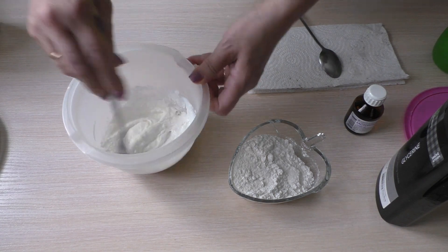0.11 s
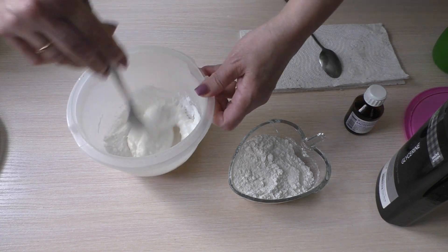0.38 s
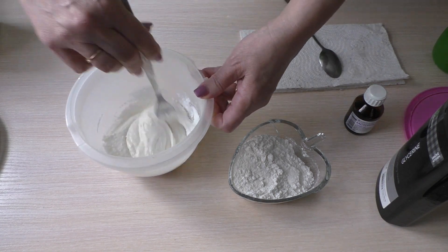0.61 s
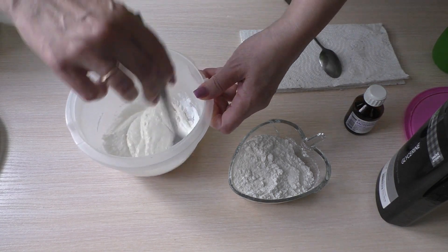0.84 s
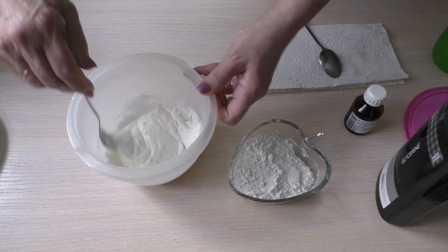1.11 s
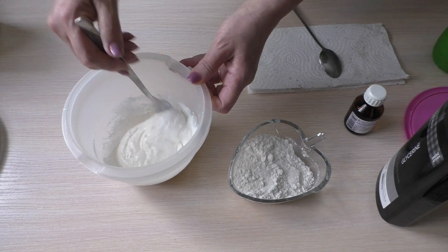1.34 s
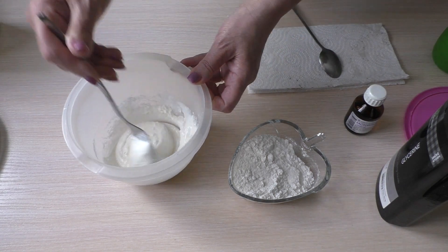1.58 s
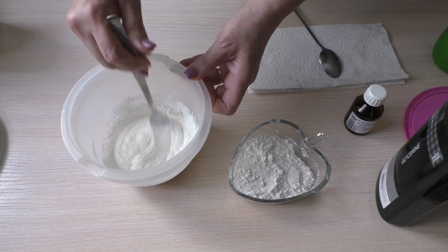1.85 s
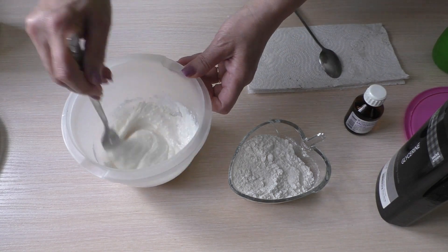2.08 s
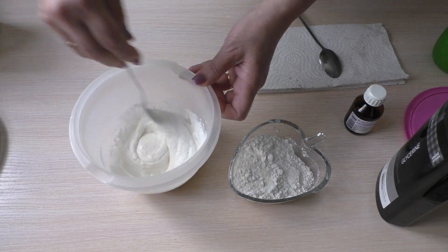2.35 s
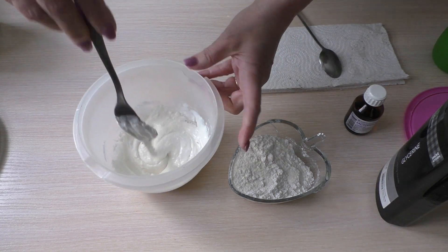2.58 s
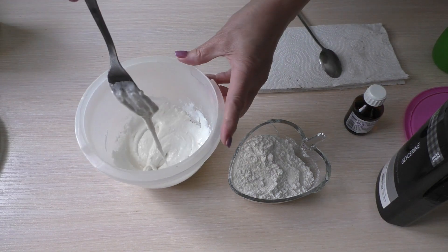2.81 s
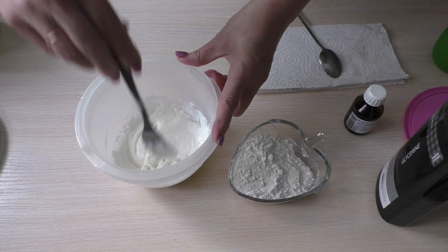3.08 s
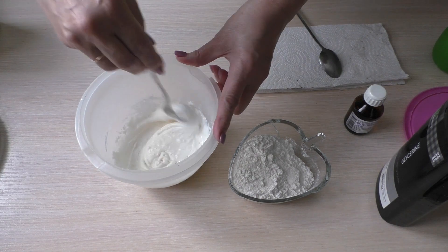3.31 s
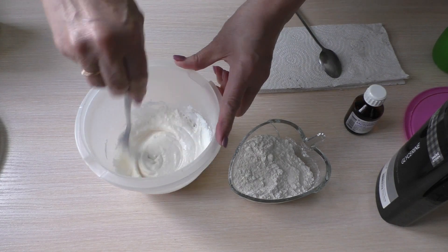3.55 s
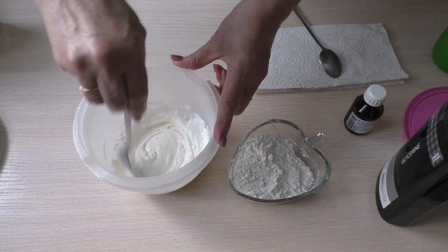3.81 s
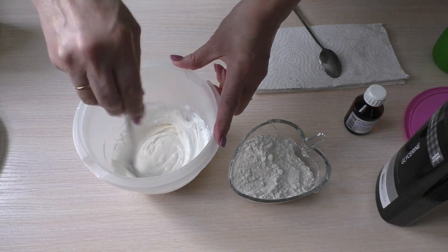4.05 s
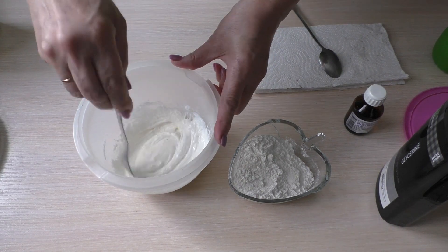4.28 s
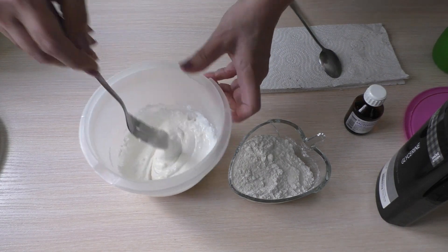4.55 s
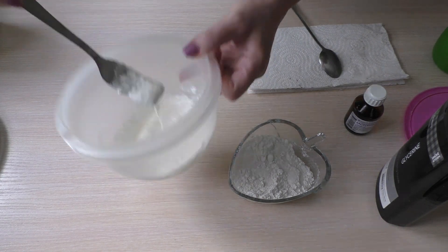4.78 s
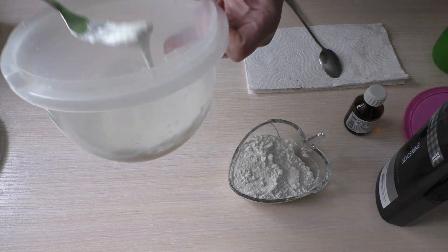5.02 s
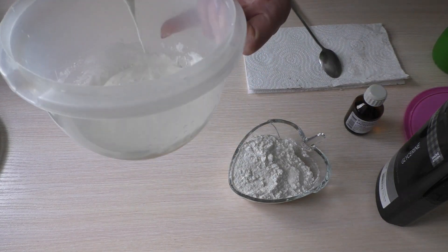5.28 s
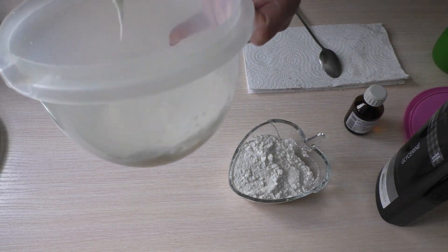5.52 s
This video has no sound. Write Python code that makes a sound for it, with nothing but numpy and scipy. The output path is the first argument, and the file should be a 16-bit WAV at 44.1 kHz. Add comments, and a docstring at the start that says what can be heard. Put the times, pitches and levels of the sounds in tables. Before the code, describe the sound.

A metal fork scrapes and ticks in uneven bursts inside a thin plastic bowl, with hollow knocks growing harder before the bowl is lifted.

```python
"""Scratchy strokes, sharp ticks and booming knocks: a metal fork stirs thick paste in a thin plastic bowl.
The tines drag over the wall as stick-slip grains that ring its modes, tick against it and hiss in the treble;
knocks and rubbing ring the bottom; near the end the bowl is lifted off the table and a finger squeaks on it.
A small quiet room adds a short tail and steady noise; a close stereo microphone overloads on the hardest knocks."""
import sys
import numpy as np
from scipy import signal
from scipy.fft import rfft, irfft
from scipy.io import wavfile

SR = 44100
rng = np.random.default_rng(int(sys.argv[2]) if len(sys.argv) > 2 else 0)


def generate_wav(signal):
    """Clip the signal to [-1, 1] and save it as 16-bit WAV at the path in sys.argv[1]."""
    frames = np.transpose(np.atleast_2d(signal))
    scaled = np.clip(frames, -1, 1) * 32767
    pcm = np.round(scaled).astype(np.int16)
    wavfile.write(sys.argv[1], SR, pcm)


def level_to_linear(level):
    """Convert decibel levels to linear amplitude factors, elementwise."""
    exponent = np.asarray(level, float) / 20
    return 10 ** exponent


N = 248724

# Ticks of the tines on the wall. Each row: time in seconds, peak of the ringing wall in dB (before its high-pass),
# brightest region of the wall in Hz, treble crack in dB (before a boost shared by all), contact decay in seconds.
TICKS = [(0.228, -14, 4500, -21, 0.0045), (0.233, 5, 750, -38, 0.004), (0.2706, -3.5, 1890, -37, 0.0029),
         (0.32, -7.5, 1280, -49, 0.0028), (0.62, -15.5, 2090, -38, 0.00092),
         (0.643, -10, 2210, -32, 0.0012), (0.845, -26, 1980, -48, 0.0015),
         (0.941, -15.5, 2490, -41, 0.0015), (1.228, -30, 5500, -32, 0.0011), (1.249, -28, 5500, -30, 0.001),
         (1.303, -28, 2800, -30, 0.00092), (1.3157, -5, 2470, -32, 0.00097),
         (1.396, -12, 2420, -45, 0.0027), (1.5283, -13, 2450, -48, 0.0051),
         (1.5704, -7.5, 2150, -52, 0.0012), (1.831, -19, 2000, -38, 0.0029),
         (1.8807, -12, 1650, -39, 0.0016), (1.957, -11, 2260, -40, 0.003), (2.196, -12, 1180, -51, 0.0016),
         (2.272, -10.5, 1890, -50, 0.0014), (2.391, -16.5, 1900, -41, 0.0031),
         (2.495, -16.5, 1890, -39.5, 0.0014), (2.609, -34, 6900, -43, 0.002),
         (2.648, -43, 6900, -51, 0.001), (3.243, -8, 1680, -36, 0.002), (3.27, -4.5, 1540, -44, 0.0014),
         (3.304, -7, 1690, -44, 0.0011), (3.3844, -6.5, 2800, -37, 0.0019), (3.5404, -8, 2100, -41, 0.002),
         (3.6406, -13, 1990, -43, 0.0019), (3.672, -1, 1890, -28, 0.00049), (3.73, -5.5, 2960, -36, 0.0018),
         (3.7425, -8.5, 1280, -27.5, 0.0015), (3.8395, -9.5, 2720, -33.5, 0.0044),
         (3.934, -13.5, 1890, -46, 0.001), (3.9588, 0.5, 2420, -29, 0.0024),
         (3.9978, 3.5, 1890, -20.5, 0.0019), (4.152, 8, 1620, -37, 0.00051),
         (4.202, -9, 2040, -24.5, 0.0034), (4.22, 1, 3700, -20, 0.0012), (4.229, -16, 3050, -26, 0.001),
         (4.3795, 0, 1540, -39, 0.0024), (4.4094, -6.5, 3240, -32.5, 0.006),
         (4.536, -19.5, 1890, -32, 0.0032), (4.597, -18.5, 4420, -33, 0.00084),
         (4.6156, 2.5, 3150, -20, 0.0016), (4.7478, 1.5, 4200, -15, 0.0004),
         (5.5266, -20, 3600, -34, 0.0045)]
# Modes of the bowl's bottom. Each row: frequency in Hz, relative strength in dB, decay as a share of the common t60.
BOTTOM_MODES = [(127, -21.5, 0.69), (213, -8, 0.51), (266.8, -1.5, 0.93), (286.4, -3, 0.9),
                (314.8, -1, 0.37), (402.4, -3.5, 0.57), (453, -15, 1.3), (578, -24, 1.15),
                (646, -18.5, 0.77), (739, -15.5, 0.45)]


def rms_one(x):
    """Scale to unit rms."""
    return x / np.sqrt(np.mean(x ** 2) + 1e-20)


def at_hz(points, hz):
    """Read a spectrum on a log-frequency axis."""
    points = np.array(points)
    return np.interp(np.log(hz), np.log(points[:, 0]), points[:, 1])


def in_time(rows):
    """Columns of a curve table at every sample; the end values hold outside it."""
    s, *columns = np.transpose(rows)
    return [np.interp(np.arange(N) / SR, s, column) for column in columns]


def drift(rate_hz):
    """Random wander of unit rms: noise smoothed by two equal poles at rate_hz, made at every 20th sample."""
    pole = np.exp(-40 * np.pi * rate_hz / SR)
    noise = rng.standard_normal(N // 20 + 2002)
    slow = signal.lfilter([1], [1, -2 * pole, pole * pole], noise)[2000:]
    return np.interp(np.arange(N) / 20, np.arange(len(slow)), rms_one(slow))


def ring(drive, hz, t60):
    """One mode as a resonator: a unit click sets a dying sine of height 1 ringing."""
    radius, angle = level_to_linear(-60 / (t60 * SR)), 2 * np.pi * hz / SR
    feedback = [1, -2 * radius * np.cos(angle), radius * radius]
    return signal.lfilter([0, np.sin(angle)], feedback, drive + 1e-18)


def coloured(x, spectrum):
    """Give x the colour of a spectrum."""
    hz = np.maximum(np.arange(N // 2 + 1) * SR / N, 10)
    return irfft(rfft(x) * level_to_linear(at_hz(spectrum, hz)), N)


def high_pass(x, hz):
    """Small sources radiate little below their lowest mode."""
    return signal.sosfilt(signal.butter(2, hz, "high", fs=SR, output="sos"), x)


def grains(per_s, spread_db, smooth):
    """Uneven stick-slip clicks over a smooth rub; rms 1."""
    sizes = level_to_linear(spread_db * np.minimum(rng.exponential(1, N), 5)) * rng.choice([-1, 1], N)
    slips = rms_one(sizes * (rng.random(N) < per_s / SR))
    return rms_one(slips + smooth * rng.standard_normal(N))


def near(hz, centre_hz, octaves, rest):
    """Modes close to where the tines bear are driven hardest: a bell in octaves over a floor."""
    distance = np.log2(hz / centre_hz) / octaves
    return rest + np.exp(-.5 * distance ** 2)


def stirring():
    """Each stroke bites, slackens a little and lets go; overlapping strokes add in power to steer all the rubbing."""
    # Strokes over the wall. Each row: start in seconds, length in seconds, drag at the start in dB,
    # brightest region of the wall in Hz, weight on the bottom against the drag in dB.
    strokes = [(0.0, 0.018, -25, 2160, 0), (.04, .11, -39.5, 1900, 0), (.16, 0.12, -33, 1830, 1),
               (.228, 0.08, -23.5, 2000, -1.5), (.315, 0.052, -28.5, 2470, 1.5),
               (.56, 0.05, -34.5, 2000, -1), (.638, 0.096, -25, 2650, -2.5), (.848, 0.31, -36, 2100, -5),
               (.9, 0.072, -36, 2400, -17), (1.17, .125, -36, 2800, -7), (1.3, 0.075, -25.5, 2700, -2.5),
               (1.38, 0.061, -26, 1860, -0.5), (1.47, 0.045, -30.5, 2240, -9),
               (1.52, 0.043, -30.5, 2380, -3.5), (1.825, 0.027, -33, 1900, -2),
               (1.88, 0.028, -33.5, 1800, 2.5), (1.93, 0.033, -29, 2200, -7.5),
               (2.07, 0.095, -33.5, 2500, -4), (2.15, 0.049, -31.5, 1800, 6.5), (2.225, 0.1, -25, 2000, 0),
               (2.345, 0.068, -31, 2070, 6.5), (2.42, 0.085, -40.5, 2000, 3),
               (2.8, 0.082, -39.5, 1900, 6.5), (2.85, 0.055, -34, 2300, 4.5), (3.28, 0.038, -29, 1700, -11),
               (3.33, 0.069, -25.5, 2980, -1.5), (3.42, 0.075, -30.5, 2580, -2),
               (3.51, 0.078, -28, 2080, -1.5), (3.615, 0.12, -26.5, 2200, -7),
               (3.76, 0.092, -28.5, 2900, -3), (3.87, 0.07, -30.5, 2170, -3.5),
               (3.935, 0.11, -26, 2600, -7), (4.06, 0.073, -43, 2600, 4), (4.17, .035, -20.5, 1730, -4.5),
               (4.205, 0.033, -23.5, 2670, -0.5), (4.26, 0.094, -40.5, 1900, 8),
               (4.44, 0.14, -37, 1900, 4.5), (4.62, 0.037, -36, 3750, -3), (4.655, .085, -37, 2800, 4),
               (4.755, 0.023, -38.5, 4470, -6), (5.525, 0.087, -38.5, 2205, -5.5)]
    bite_db_per_s, let_go_db_per_s, sag_db_per_s = 900, 702, 5
    # between strokes the fork still moves in the paste until the bowl is lifted
    idle_db, idle_hz, idle_weight_db = -45, 1900, 2.5
    lift_s, lift_db_per_s = 4.8, 146
    hiss_base_db = -12.5      # against the drag at 2200 Hz with no extra weight
    hiss_db_per_octave, skim_hiss = 2, 0.16      # more hiss higher up the wall, and per dB that the fork weighs less
    heavy_base_db, rumble_base_db = -6.5, -1      # low wall modes and bottom, against drag plus weight

    t = np.arange(0, N, 32) / SR
    rows = [*strokes, (0, 0, 0, idle_hz, idle_weight_db)]
    s, length, db, hz, weight_db = (column[:, None] for column in np.transpose(rows))
    bite = bite_db_per_s * np.maximum(s - t, 0)
    sag = sag_db_per_s * np.clip(t - s, 0, length)
    let_go = let_go_db_per_s * np.maximum(t - s - length, 0)
    shape_db = db - bite - sag - let_go
    shape_db[-1] = idle_db - lift_db_per_s * np.maximum(t - lift_s, 0)
    power = level_to_linear(2 * np.maximum(shape_db, -120))

    def level(extra_db):
        """Summed power of all strokes in dB, each shifted by its extra."""
        return 10 * np.log10(np.sum(power * level_to_linear(2 * extra_db), axis=0))

    centre_hz = np.sum(power * hz, axis=0) / power.sum(axis=0)
    hiss_db = hiss_base_db + level(hiss_db_per_octave * np.log2(hz / 2200) - skim_hiss * weight_db)
    weight_level = level(weight_db)
    controls = level(0 * hz), centre_hz, hiss_db, heavy_base_db + weight_level, rumble_base_db + weight_level
    return [np.interp(np.arange(N) / SR, t, control) for control in controls]


def contacts():
    """Each tick is a click followed by a short chatter that dies away."""
    t = np.arange(2400) / SR
    decay_s = np.clip(np.array(TICKS)[:, 4:5], 2e-4, .01)
    out = .2 * rng.standard_normal((len(TICKS), len(t))) * np.exp(-t / decay_s)
    out[:, 0] = 1
    return out


def lay(bursts, peaks_db):
    """Place one burst at each tick, at its peak level."""
    out = np.zeros((*bursts.shape[1:-1], N + bursts.shape[-1]))
    for row, burst, db in zip(TICKS, bursts, peaks_db):
        at = round(row[0] * SR)
        out[..., at:at + burst.shape[-1]] += level_to_linear(db) * burst / np.abs(burst).max()
    return out[..., :N]


def wall(drag_db, centre_hz, heavy_db):
    """Drag and ticks drive the wall modes, each a little louder on the left and in alternating polarity."""
    # Modes of the bowl's wall. Each row: frequency in Hz, relative strength in dB, t60 in seconds under the drag.
    wall_modes = [(480, 2.5, 0.016), (590, -22, 0.017), (799, -8.5, 0.043), (890, -16, 0.015),
                  (955, -2, 0.017), (1136, -9, 0.056), (1280, 1.5, 0.017), (1540, 2.5, 0.017),
                  (1720, 5.5, 0.014), (1890, 3.5, 0.016), (2060, 1.5, 0.012), (2272, -0.5, 0.01),
                  (2410, 3, 0.0079), (2650, -2.5, 0.028), (2733, 2.5, 0.016), (3105, 7, 0.012),
                  (3435, 7.5, 0.0066), (3860, 1.5, 0.017), (4110, 0, 0.0095), (4306, -1, 0.015),
                  (4510, 5.5, 0.007), (5820, 4.5, 0.0036), (5600, -3.5, 0.0044), (6400, 9, 0.0033),
                  (7100, 4, 0.0043)]
    heavy_below_hz = 1250      # modes below this follow the weight, the others the drag
    tick_octaves, tick_octaves_per_db = 0.61, 0.02      # breadth driven by a 0 dB tick; softer ticks reach less

    lumps = level_to_linear(2.4 * drift(35))
    rubs = [lumps * grains(per_s=1500, spread_db=4.5, smooth=0.71) for tine in range(4)]
    ticks = contacts()
    _, peak_db, tick_hz, _, _ = np.transpose(TICKS)
    breadth = np.maximum(tick_octaves + tick_octaves_per_db * peak_db, .1)
    luck = rng.normal(0, 1, (len(TICKS), len(wall_modes)))
    drags, hits, powers = np.zeros((2, 2, N)), 0, np.zeros((2, N))
    for k, (hz, db, t60) in enumerate(wall_modes):
        lean_db = 0.82 + 0.47 * (-1) ** (k // 2)
        side = (-1) ** k * level_to_linear(np.array([[1], [-1]]) * lean_db)

        heavy = int(hz < heavy_below_hz)
        focus = 1.5 * near(hz, centre_hz, octaves=.14, rest=0)
        spread = near(hz, centre_hz, octaves=0.81, rest=0.32)
        bearing = level_to_linear(db) * (1 if heavy else focus + spread)
        powers[heavy] += bearing ** 2 * t60 * SR / (12 * np.log(10))      # power of the ringing under unit noise
        rub = rubs[k // 2 % 4] * bearing * level_to_linear(1.4 * drift(52))
        drags[heavy] += side * ring(rub, hz, t60)

        strength = level_to_linear(db + 2.5 * luck[:, k])
        strike = strength * near(hz, tick_hz, breadth, rest=0.033)
        hits = hits + side * ring(ticks * strike[:, None], hz, 0.46 * t60)[:, None]      # ticks ring shorter
    drag = level_to_linear([drag_db, heavy_db])[:, None] * drags / np.sqrt(powers)[:, None]
    return high_pass(drag.sum(axis=0) + lay(hits, peak_db), hz=506)


def tines(hiss_db):
    """The treble: a fine scratch under the stroke, its colour wandering, and a crack at each tick."""
    # Colour of the scratch. Each row: frequency in Hz, relative density in dB per Hz.
    hiss_colour = [(2350, -57), (4000, 10.5), (4540, -2), (5250, 4.5), (6180, -15), (7880, 0),
                   (14400, -0.5), (16000, -21)]
    mid, side = [grains(per_s=11000, spread_db=0.5, smooth=0.83) for part in range(2)]
    flutter = level_to_linear(2 * drift(40))
    scratch = coloured((mid + 0.06 * side * [[1], [-1]]) * flutter, hiss_colour)
    top = high_pass(scratch, hz=9400)
    scratch = top * level_to_linear(1.5 * drift(12)) + (scratch - top) * level_to_linear(1.5 * drift(12))
    crack_band = signal.butter(2, [4000, 13500], "band", fs=SR, output="sos")
    cracks = lay(signal.sosfilt(crack_band, contacts()), np.array(TICKS)[:, 3])
    both = level_to_linear(hiss_db) * rms_one(scratch) + level_to_linear(14.5) * cracks
    return both * level_to_linear([[.7], [-.7]])      # slightly louder on the left


def knocks():
    """A soft blow rings every bottom mode; hand and paste damp it fast."""
    # Knocks on the bottom. Each row: time in seconds, peak in dB before the bottom's high-pass.
    blows = [(0.233, 5), (0.314, -12), (0.678, -23), (0.846, -22), (1.189, -28.5), (1.387, -16),
             (1.877, -15.5), (2.001, -21), (2.151, -19), (2.23, -13.5), (2.296, -16), (2.329, -9),
             (2.494, -22.5), (2.59, -17.5), (3.245, -2), (3.272, 0), (3.413, -16), (3.555, -16),
             (3.742, -11.5), (4.014, -10.5), (4.152, 3.5), (4.381, 3.5), (4.572, -10), (4.647, -16.5),
             (4.695, -16)]
    t60_s, t60_s_per_db = 0.066, 0.0031      # decay of a 0 dB knock; a softer one is pressed less and rings longer
    out, length = np.zeros(N + SR), SR // 2
    t = np.arange(length) / SR
    luck = rng.normal(0, 1, (len(blows), len(BOTTOM_MODES)))
    for (s, peak_db), strengths in zip(blows, luck):
        boom = np.zeros(length)
        for (hz, db, share), chance in zip(BOTTOM_MODES, strengths):
            # a blow reaches the upper modes better than a slow push does
            start_db = db + 2.0 * chance + 2.2 * np.log2(hz / 300)
            mode_t60 = (t60_s - t60_s_per_db * peak_db) * share
            boom += level_to_linear(start_db - 60 * t / mode_t60) * np.sin(2 * np.pi * hz * t)
        boom *= 1 - np.exp(-t / 0.0044)      # the blow takes time to land
        at = round(s * SR)
        out[at:at + length] += level_to_linear(peak_db) * boom / np.abs(boom).max()
    return out[:N]


def rumble(level_db):
    """Dragging keeps the bottom modes humming in lumps."""
    rub = grains(per_s=400, spread_db=3.0, smooth=.9) * level_to_linear(1.5 * drift(30))
    hum = sum(level_to_linear(db) * ring(rub, hz, 0.18 * share) for hz, db, share in BOTTOM_MODES)
    return level_to_linear(level_db) * rms_one(hum)


def squeak():
    """A finger slides on the lifted bowl: a faint narrow wavering tone of skin slipping on plastic."""
    # Path of the tone. Each row: time in seconds, mean frequency in Hz, mean level in dB.
    slide = [(4.8, 2220, -80), (4.82, 2200, -40), (4.85, 1890, -38), (4.87, 1900, -60), (4.95, 1890, -46),
             (4.99, 1825, -53)]
    hz, level_db = in_time(slide)
    wavering_hz = hz * (1 + 0.0159 * drift(133))
    return level_to_linear(level_db + 1.2 * drift(57)) * np.sin(2 * np.pi * np.cumsum(wavering_hz) / SR)


def room(x, apart):
    """A tail of noise, partly alike in both ears, the treble dying sooner."""
    t60_s, treble_above_hz = 0.25, 3900
    t = np.arange(SR // 2) / SR
    mid, side = rng.standard_normal((2, len(t)))
    noise = mid + apart * side * [[1], [-1]]
    dull = signal.sosfilt(signal.butter(1, treble_above_hz, fs=SR, output="sos"), noise)
    tail = dull * level_to_linear(-60 * t / t60_s) + (noise - dull) * level_to_linear(-60 * t / (0.82 * t60_s))
    tail *= 1 - np.exp(-t / 0.00067)      # the table top answers first, the walls later
    tail /= np.sqrt(np.mean(np.sum(tail ** 2, axis=1)))
    return signal.fftconvolve(x[None], tail, axes=1)[:, :N]


def air():
    """Steady room and microphone noise, its left-right likeness varying with pitch, with two faint narrow bands."""
    # Colour of the noise. Each row: frequency in Hz, relative density in dB per Hz.
    air_colour = [(15, -49), (25, -12), (82, -11), (181, -6.5), (238, -13), (398, -11), (631, -27),
                  (805, -24), (1210, -14.5), (2880, -25), (3130, -23.5), (6160, -39), (14700, -31),
                  (16400, -36)]
    # Left-right likeness of the noise. Each row: frequency in Hz, correlation from 0 to 1.
    likeness = [(60, 0.19), (180, 0.43), (550, 0.79), (1650, 0.37), (4970, 0.19), (15000, 0.41)]
    # Narrow steady bands. Each row: centre in Hz, width in Hz some 7 dB down, level in dB.
    faint_whine = [(2000, 54, -82), (3000, 52, -57)]
    mid, side = rfft(rng.standard_normal((2, N)))
    hz = np.maximum(np.arange(len(mid)) * SR / N, 10)
    alike = np.clip(at_hz(likeness, hz), 0, 1)
    white = irfft(np.sqrt(1 + alike) * mid + np.sqrt(1 - alike) * side * [[1], [-1]], N)
    whine = sum(level_to_linear(db) * rms_one(ring(rng.standard_normal(N), centre_hz, 4.3 / width_hz))
                for centre_hz, width_hz, db in faint_whine)
    return level_to_linear(-40) * rms_one(coloured(white, air_colour)) + whine


def scene():
    """Bowl, room and background."""
    drag_db, centre_hz, hiss_db, heavy_db, rumble_db = stirring()
    upper = wall(drag_db, centre_hz, heavy_db) + tines(hiss_db) + squeak()
    bottom = high_pass(knocks() + rumble(rumble_db), hz=90)
    low_room = level_to_linear(-5.0) * room(bottom, apart=0.15)      # long waves reach both ears alike
    upper_room = level_to_linear(-6) * room(upper.mean(axis=0), apart=0.48)
    return bottom + low_room + upper + upper_room + air()


def band_limit(x):
    """A steep low-pass at the top of the band."""
    return signal.sosfilt(signal.butter(12, 16500, fs=SR, output="sos"), x)


def record(dry):
    """The top is cut steeply at 15.9 kHz and the hardest knocks overload, clipping at full scale."""
    top_cut = signal.ellip(6, .5, 30, 15900, fs=SR, output="sos")
    cut = signal.sosfilt(top_cut, dry)
    return band_limit(np.clip(cut, -1, 1))


dry = scene()
out = record(dry)
generate_wav(out)
```